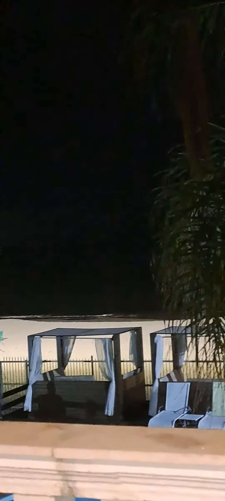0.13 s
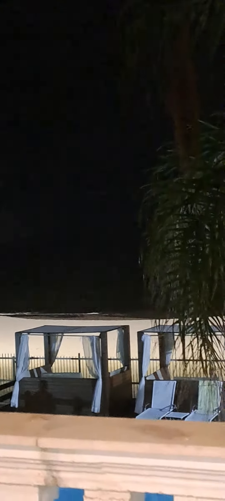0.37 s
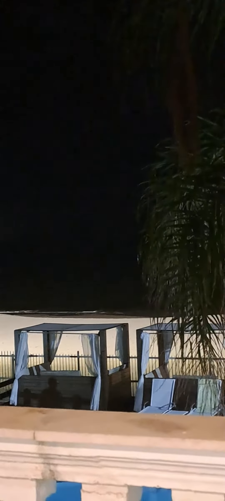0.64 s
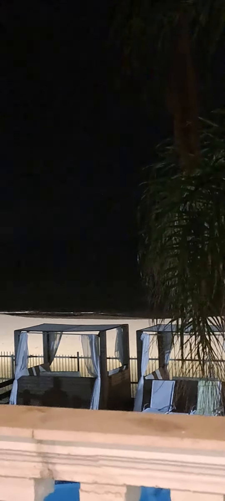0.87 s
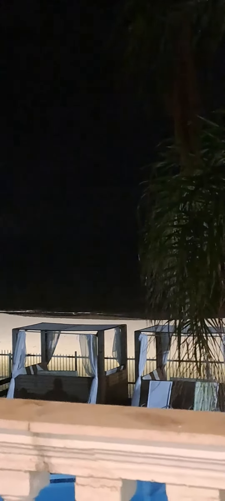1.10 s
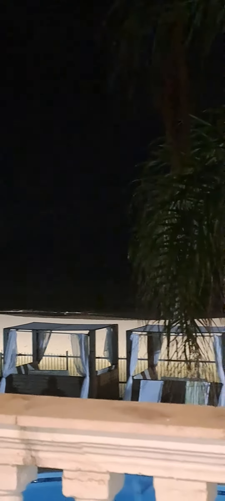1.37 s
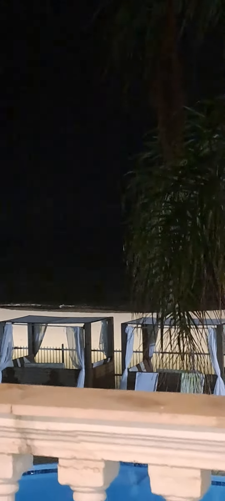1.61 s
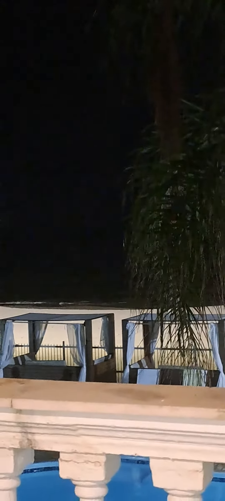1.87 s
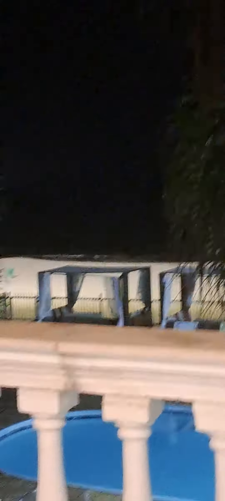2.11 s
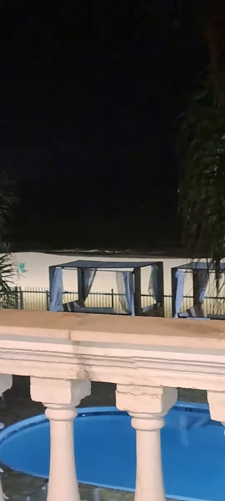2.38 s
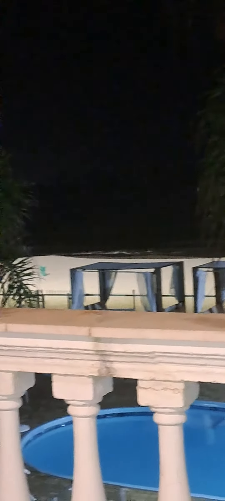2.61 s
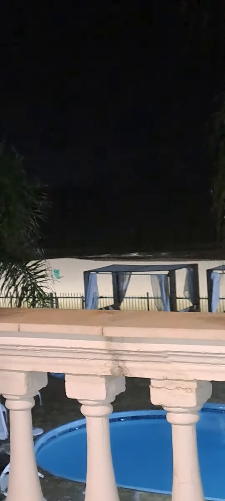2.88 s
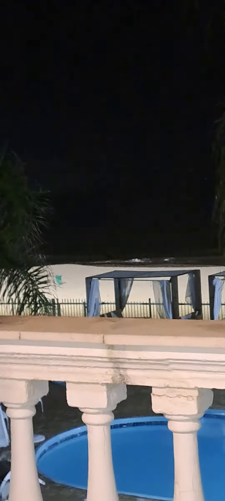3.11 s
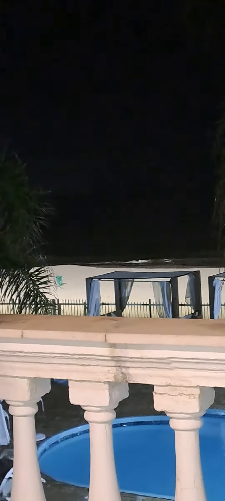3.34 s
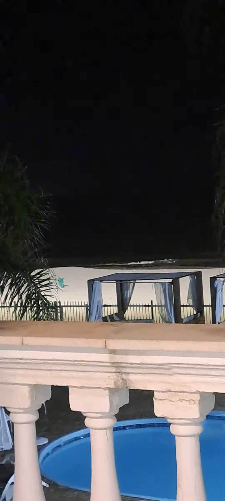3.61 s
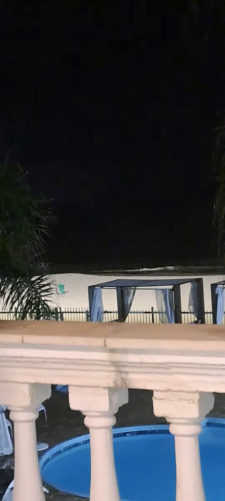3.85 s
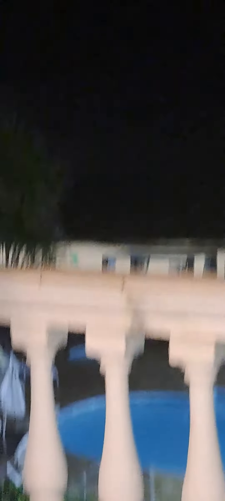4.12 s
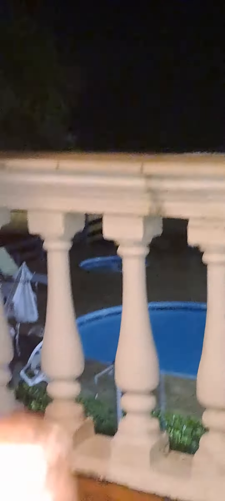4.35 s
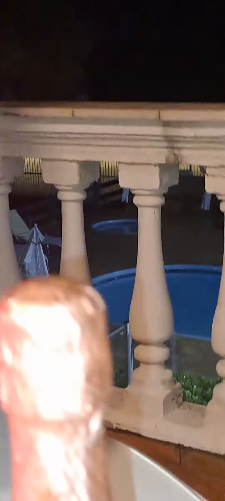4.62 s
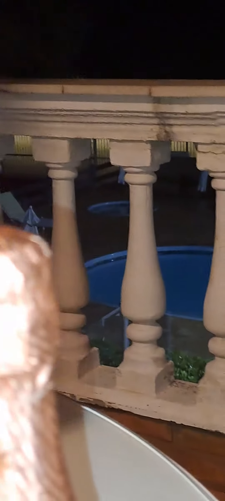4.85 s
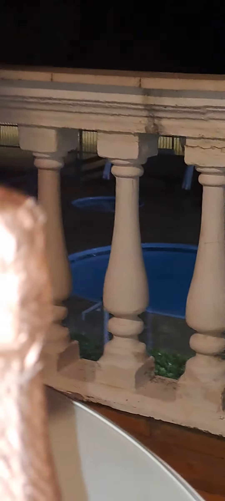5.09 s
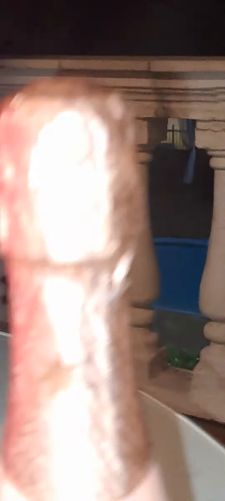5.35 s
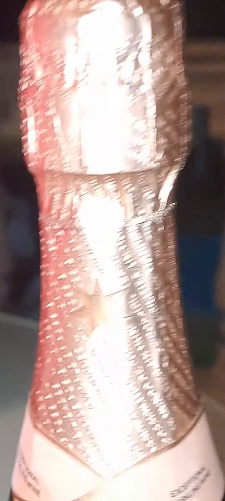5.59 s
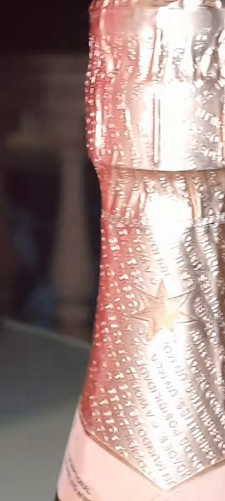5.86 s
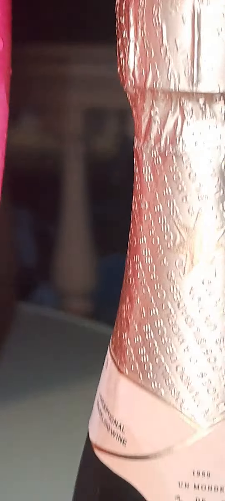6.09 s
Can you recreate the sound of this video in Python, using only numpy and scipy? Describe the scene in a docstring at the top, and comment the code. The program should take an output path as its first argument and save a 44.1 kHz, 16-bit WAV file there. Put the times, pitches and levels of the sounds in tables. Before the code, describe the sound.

On a quiet night balcony, soles swish and thud, a chair leg scrapes tile, a distant wave swells, then a bottle and cup knock a table.

```python
"""A glass bottle, then a plastic cup, set down on a hollow table close by on the right, rocking a little.
The place is a tiled balcony at night above a beach: table top, vessel and clatter ring as decaying modes.
Before that a chair leg drags in stick-slip jerks; soles swish and thud on the tiles as swelling noise.
Farther off a wave swells and fades in coloured noise, and a machine hums as a wavering low tone.
The stereo microphone gets the near sounds later and duller on its left, with dense balcony reflections."""
import sys
import numpy as np
from scipy import signal
from scipy.io import wavfile

SR = 44100
rng = np.random.default_rng(int(sys.argv[2]) if len(sys.argv) > 2 else 0)


def generate_wav(sig):
    """Save sig (samples, or channels by samples) to the path in sys.argv[1] as 16-bit PCM at SR."""
    pcm = np.round(np.clip(np.atleast_2d(sig).T, -1, 1) * 32767).astype(np.int16)
    wavfile.write(sys.argv[1], SR, pcm)


def amplitude_ratio(level_db):
    """Convert a level in decibels to the matching linear amplitude (field) ratio."""
    exponent = np.asarray(level_db, float) / 20
    return 10 ** exponent


N = 274302  # length in samples


def rms_one(x):
    """Scales to unit power."""
    return x / np.sqrt(np.mean(x ** 2) + 1e-20)


def over_time(points):
    """Reads a timed level, joined by straight lines, at every sample."""
    s, level_db = np.transpose(points)
    return np.interp(np.arange(N) / SR, s, level_db)


def at_hz(points, hz):
    """Reads a spectrum on a log-frequency axis."""
    points_hz, values = np.transpose(points)
    return np.interp(np.log(hz), np.log(points_hz), values)


def drift(rate_hz):
    """Slow random wandering of spread 1: noise through two equal low-pass poles, at one point in 40 samples."""
    r = np.exp(-80 * np.pi * rate_hz / SR)
    noise = rng.standard_normal(N // 40 + 2002)
    slow = signal.lfilter([1], [1, -2 * r, r * r], noise)[2000:]
    return np.interp(np.arange(N) / 40, np.arange(len(slow)), rms_one(slow))


def resonate(x, hz, width_hz):
    """One resonance, gain 1 on top."""
    r = np.exp(-np.pi * width_hz / SR)
    poles = [1, -2 * r * np.cos(2 * np.pi * hz / SR), r * r]
    return signal.lfilter([(1 - r * r) / 2, 0, (r * r - 1) / 2], poles, x)


def high_pass(x, hz):
    """Takes away the bass below hz."""
    return signal.sosfilt(signal.butter(3, hz, "high", fs=SR, output="sos"), x)


def power_db(spectrum, low_hz, high_hz):
    """Power that white noise keeps in one band after this colouring."""
    hz = np.linspace(low_hz, high_hz, 200)
    return 10 * np.log10(np.mean(amplitude_ratio(2 * at_hz(spectrum, hz))) * (high_hz - low_hz) / (SR / 2))


def swells(rows):
    """Power of each swell over time: a rounded rise to its loudest moment, then a fall."""
    edge_db, roundness = 20, 1.534  # a swell loses edge_db over its rise or fall time
    s, rise_s, fall_s, db = np.transpose(rows)[:4, :, None]
    late = np.arange(0, N + 32, 32) / SR - s
    distance = np.abs(late / np.where(late < 0, rise_s, fall_s))
    return amplitude_ratio(2 * (db - edge_db * distance ** roundness)) + 1e-30


def blend(power, values):
    """Total level in dB of overlapping sounds, and a property averaged by their power."""
    total = power.sum(axis=0)
    at = np.linspace(0, power.shape[1] - 1, N)
    columns = 10 * np.log10(total), np.dot(values, power) / total
    return [np.interp(at, np.arange(len(total)), c) for c in columns]


# Half-octave band edges [Hz]
EDGES_HZ = 25 * 2 ** np.arange(0, 9.6, .5)
# How alike left and right are: (frequency [Hz], likeness [-1 to 1])
LIKENESS = [(60, 1), (180, 0.89), (550, 0.73), (1650, -0.034), (4970, -0.012), (15000, 0.096)]


def noise_bands(size):
    """Half-octave bands of stereo noise, alike in the bass and nearly unrelated in the treble."""
    white = rng.standard_normal((2, 2, size))
    for k, (low, high) in enumerate(zip(EDGES_HZ, EDGES_HZ[1:])):
        # neighbouring bands take turns between two independent noises
        band_pass = signal.butter(2, [low, high], "band", fs=SR, output="sos")
        mid, side = signal.sosfilt(band_pass, white[k % 2])
        hz = np.sqrt(low * high)
        alike = np.clip(at_hz(LIKENESS, hz), -1, 1)
        yield hz, np.sqrt((1 + alike) / 2) * mid + np.sqrt((1 - alike) / 2) * side * [[1], [-1]]


# Reverberation of the balcony: (frequency [Hz], time to fall 60 dB [s])
BALCONY_T60 = [(100, 0.42), (400, 0.25), (1500, 0.27), (4000, 0.27), (9000, 0.19), (16000, 0.1)]


def balcony(x, onset_s):
    """Dense reflections from tiles and walls, dying band by band."""
    t = np.arange(SR // 2) / SR
    tail = sum(band * amplitude_ratio(-60 * t / at_hz(BALCONY_T60, hz)) for hz, band in noise_bands(len(t)))
    tail = tail * (1 - np.exp(-t / onset_s))
    tail = tail / np.sqrt(np.mean(np.sum(tail ** 2, axis=1)))
    return signal.fftconvolve(x[None], tail, axes=1)[:, :N]


def from_right(x, lag_s, left_db, right_db, shadow_hz):
    """A source on the right: the left side hears it later, softer and duller."""
    late = np.interp(np.arange(N) - lag_s * SR, np.arange(N), x)
    late = signal.lfilter(*signal.butter(1, shadow_hz, fs=SR), late)
    return np.array([amplitude_ratio(left_db) * late, amplitude_ratio(right_db) * x])


# Colour of the night air: (frequency [Hz], density [dB per Hz, relative])
NIGHT_AIR = [(18, -33), (30, -33), (75, 13.5), (447, -21), (931, -19), (2330, -3), (3540, -72),
             (4260, -12.5), (7200, -5.5), (9350, -57), (15800, -9)]


def night_air():
    """Steady coloured noise floor of the night; gives its power at any frequency."""
    air_db = -64 - power_db(NIGHT_AIR, 30, 15800)
    return lambda hz: amplitude_ratio(2 * (air_db + at_hz(NIGHT_AIR, hz)))


# Far wave, swelling and fading: (time [s], level within 500-1500 Hz [dB])
SURF = [(0.0, -61), (0.5, -64), (1.1, -66), (1.6, -73), (2.0, -67), (2.9, -60), (3.4, -62.5), (3.7, -52),
        (4.2, -50.5), (4.96, -55), (5.15, -63), (5.6, -65)]
# Its colour: (frequency [Hz], density [dB per Hz, relative])
SURF_COLOUR = [(88, -41), (150, -9.5), (217, -9), (332, -7.5), (490, -3.5), (781, -7.5), (1110, -7.5),
               (2200, -12.5), (6500, -27), (9000, -42), (15500, -70)]


def surf():
    """A far wave as noise of fixed colour and moving level; gives its power at any frequency."""
    surf_db = over_time(SURF) - power_db(SURF_COLOUR, 500, 1500)
    return lambda hz: amplitude_ratio(2 * (surf_db + at_hz(SURF_COLOUR, hz)))


# Machine hum, before its waver: (time [s], level [dB])
HUM = [(0.0, -51), (0.08, -51), (0.2, -67), (0.4, -40), (0.48, -51), (1.9, -55), (2.9, -59.5), (3.15, -63),
       (3.85, -47.5), (4.3, -53), (4.75, -55), (5.3, -48), (5.6, -49.5), (6.22, -61)]


def hum():
    """A low tone whose pitch and level waver, with a slight roughness around it."""
    hum_hz, width_hz = 58.5, 8
    waver_db, waver_hz = 2.3, 4.6
    tone = np.sin(2 * np.pi * np.cumsum(hum_hz + 1.45 * drift(1.92)) / SR)
    rough = rms_one(resonate(rng.standard_normal((2, N)), hum_hz, width_hz))
    level = amplitude_ratio(over_time(HUM) + waver_db * drift(waver_hz))
    return level * rms_one(tone + .15 * rough)


# Weight shifting on the floor: (loudest time [s], rise [s], fall [s], level within 75-350 Hz [dB])
THUDS = [(.36, 0.061, 0.2, -48.5), (.64, 0.86, 0.3, -47), (1.3, .15, 0.23, -56.5), (1.77, 0.092, 0.14, -70),
         (3.09, .3, 0.27, -53.5), (3.83, 0.067, 0.16, -49), (4.15, 0.63, 0.75, -50.5),
         (4.54, 0.1, 0.11, -44.5), (4.9, 0.49, .4, -58.5), (5.3, 0.7, 0.33, -53)]
# Colour of the floor: (frequency [Hz], density [dB per Hz, relative])
THUD_COLOUR = [(25, -48), (45, 6), (90, 6.5), (200, 0), (350, -4.5), (700, -15), (1500, -50)]


def thuds():
    """Weight on the tiles as swells of bass noise over a low rumble; gives power at any frequency."""
    rumble_db = -58  # goes on between the thuds
    power = swells(THUDS) + amplitude_ratio(2 * rumble_db) / len(THUDS)
    thud_db, _ = blend(power, np.ones(len(THUDS)))
    thud_db = thud_db - power_db(THUD_COLOUR, 75, 350) + 1.96 * drift(8.6)
    return lambda hz: amplitude_ratio(2 * (thud_db + at_hz(THUD_COLOUR, hz)))


# Soles and cloth sliding: (loudest time [s], rise [s], fall [s],
# level within 9900-14560 Hz before the tilt [dB], tilt around 6 kHz [dB per octave])
SWISH = [(0.03, .1, 0.3, -56, 1.5), (0.388, 0.052, 0.067, -53, -2.5), (.49, 0.074, 0.08, -56.5, 0),
         (.58, 0.028, .1, -54.5, 5), (0.672, 0.13, .13, -46.5, 2), (0.939, .15, 0.17, -46.5, 0.8),
         (1.178, 0.006, 0.067, -46.5, 2), (1.35, 0.42, 0.11, -57.5, 1.5), (1.63, 0.074, 0.22, -67, 2.5),
         (1.727, .02, 0.091, -60.5, -2.5), (1.799, .04, 0.082, -58, 0.7), (2.08, 0.09, .3, -66.5, -2),
         (2.37, 0.052, 0.12, -66.5, -1.5), (2.74, 0.29, 0.13, -58.5, 2), (2.89, 0.092, 0.12, -45.5, .3),
         (3.068, 0.33, .16, -48.5, -0.2), (3.58, 0.27, 0.34, -62, -3.5), (3.81, 0.13, 0.3, -58, -4.5),
         (3.89, .035, 0.14, -44, 1.1), (4.05, 0.12, 0.12, -53, -2.5), (4.408, 0.05, 0.087, -39.5, 1.5),
         (4.52, 0.19, 0.13, -56.5, -0.5), (4.71, 0.044, .4, -60.5, -3), (4.88, 0.06, 0.14, -51, 2),
         (5.049, .08, 0.17, -44, 0.4), (5.169, 0.064, 0.059, -50.5, 2), (5.34, 0.089, 0.1, -55.5, -1.4),
         (5.52, 0.054, 0.16, -67, -1.1), (5.927, 0.0036, .3, -69, 8.5), (6.0, 0.045, 0.11, -65, 8),
         (6.125, 0.019, 0.046, -61, 8), (6.2, 0.15, 0.17, -65.5, 7)]
# Colour before the tilt: (frequency [Hz], density [dB per Hz, relative])
SWISH_COLOUR = [(710, -6.5), (1200, -3), (1590, -19), (1680, -0.5), (2500, -4.5), (3240, 0.5), (3890, -2.5),
                (4820, -1), (7510, -3), (8540, -18), (12200, -3.5), (15100, 0.5), (15800, -22)]


def swishes():
    """Sliding soles and cloth as swells of noise, each with its own tilt; gives power at any frequency."""
    swish_db, tilt_db = blend(swells(SWISH), np.array(SWISH)[:, -1])
    swish_db = swish_db - power_db(SWISH_COLOUR, 9900, 14560) + 1.6 * drift(20)
    return lambda hz: amplitude_ratio(2 * (swish_db + at_hz(SWISH_COLOUR, hz) + tilt_db * np.log2(hz / 6000)))


# Balance of the noises at the microphone: (frequency [Hz], left minus right [dB])
LEAN = [(100, -0.5), (1000, -0.5), (8000, -1), (12000, -7.5), (15500, -7)]


def surroundings():
    """Night air, wave, thuds and swishes are all noisy: their powers add in each flickering band."""
    sources = [night_air(), surf(), thuds(), swishes()]
    out = 0
    for hz, band in noise_bands(N):
        power = sum(source(hz) for source in sources)
        flicker = amplitude_ratio(2.02 * drift(2.44))
        lean = amplitude_ratio(at_hz(LEAN, hz) / 2 * np.array([[1], [-1]]))
        out = out + np.sqrt(power) * flicker * lean * band
    return out


# Coloured scuffs: (middle [s], half length [s], frequency [Hz], width [Hz], level at the middle [dB])
SCUFFS = [(0.338, 0.033, 1920, 352, -49.5), (1.18, 0.0053, 2600, 1500, -63.5),
          (2.19, 0.031, 4300, 150, -62), (4.77, 0.063, 1630, 250, -62), (6.166, 0.085, 4800, 700, -55),
          (6.12, .1, 12300, 1500, -60)]


def scuffs():
    """Short rubs, each noise in one resonance of its own."""
    t = np.arange(N) / SR
    out = 0
    for s, half_s, hz, width_hz, db in SCUFFS:
        rub = rms_one(resonate(rng.standard_normal((2, N)), hz, width_hz))
        out = out + amplitude_ratio(db) * np.exp(-((t - s) / half_s) ** 2) * rub
    return out


def jerks(s, length_s, db, attack_s, sag_db_per_s):
    """Power of each jerk: quick start, steady sag, then the leg lets go."""
    let_go_s = 0.022
    t = np.maximum(np.arange(N) / SR - s[:, None], 0)
    let_go = np.exp(-np.maximum(t - length_s[:, None], 0) / let_go_s)
    shape = (1 - np.exp(-t / attack_s)) * let_go
    return (shape * amplitude_ratio(db[:, None] - sag_db_per_s * t)) ** 2 + 1e-30


# Jerks of the dragging chair leg, levels before the sag:
# (time [s], length [s], frame boom [dB], grit [dB], grit brightness around 1 kHz [dB per octave])
DRAGS = [(2.053, 0.12, -41, -36.5, -1.1), (2.34, 0.11, -47, -55.5, -14.5), (2.543, .05, -32.5, -31.5, 1.5),
         (2.582, 0.1, -30, -31, 1), (2.681, 0.031, -41, -41, -3)]
# Resonances of the boom: (frequency [Hz], width [Hz], relative level [dB])
CHAIR_BOOM = [(148, 44.5, 1), (205, 127, -1.5), (241, 54, 1.5)]
# Resonances of the grit: (frequency [Hz], width [Hz], relative level [dB])
CHAIR_GRIT = [(380, 90, -0.5), (615, 130, 4), (860, 80, 3), (1314, 204, 3), (2410, 270, -1), (3070, 92, -5),
              (3570, 240, -12), (4350, 220, -7), (5020, 440, -9.5), (6340, 520, -16), (7350, 550, -16.5),
              (13000, 3100, -25.5)]


def chair():
    """The leg sticks and slips at a wobbling rate, with fine grit between; frame and foot resonate."""
    slips_per_s, grains_per_s = 196, 2500
    s, length_s, boom_db, grit_db, tilt_db = np.transpose(DRAGS)
    boom_db, _ = blend(jerks(s, length_s, boom_db, attack_s=0.0053, sag_db_per_s=58), tilt_db)
    grit_db, tilt_db = blend(jerks(s, length_s, grit_db, attack_s=0.0014, sag_db_per_s=184), tilt_db)
    # one impulse of random size per slip
    turns = np.floor(np.cumsum(slips_per_s * (1 + .16 * drift(50))) / SR)
    slips = np.diff(turns, prepend=0) * amplitude_ratio(4.1 * rng.standard_normal(N))
    # grains at random times, a few of them much larger
    sizes = amplitude_ratio(5.6 * np.minimum(rng.exponential(1, N), 5)) * rng.choice([-1, 1], N)
    grains = sizes * (rng.random(N) < grains_per_s / SR)
    force = rms_one(slips) + 0.98 * rms_one(grains)

    def parts(modes):  # neighbouring resonances have opposite sign
        return [amplitude_ratio(db) * resonate(force, hz, w) * (-1) ** k for k, (hz, w, db) in enumerate(modes)]

    boom = sum(parts(CHAIR_BOOM))
    grit_parts = parts(CHAIR_GRIT)
    grit = sum(amplitude_ratio(tilt_db * np.log2(hz / 1000)) * part for (hz, _, _), part in zip(CHAIR_GRIT, grit_parts))
    drag = amplitude_ratio(boom_db) * rms_one(boom) + amplitude_ratio(grit_db) * grit / np.std(sum(grit_parts))
    return high_pass(drag, 100)


def rings(modes, t, swell_s):
    """Decaying sines that swell while the contact builds up."""
    hz, db, t60 = np.transpose(modes)[:, :, None]
    strength = amplitude_ratio(db + 1.0 * rng.standard_normal(hz.shape))
    swell = 1 - np.exp(-(t / swell_s) ** 2)
    return np.sum(strength * swell * amplitude_ratio(-60 * t / t60) * np.sin(2 * np.pi * hz * t), axis=0)


# Set-downs and small touches, levels at the table: (time [s], peak of the table knock [dB],
# contact [ms], clatter against the knock [dB], feed to the reflections against the direct sound [dB])
KNOCKS = [(5.437, -40, 0.28, -23, -12), (5.628, -38.5, 0.074, -26, 16), (5.632, -2, 0.006, -14, 1),
          (5.926, -47.5, 0.12, -4.5, -8), (5.974, -67, 0.069, -16, -4), (5.993, -45.5, 0.078, -30, 11.5),
          (6.015, -25, 0.68, -14.5, -1), (6.028, -3, 0.047, -14.5, -7), (6.138, -32.5, 0.24, -14, -22),
          (6.164, -33.5, 0.18, -23, -8)]
# Modes of the table top, before the contact dulls them:
# (frequency [Hz], relative level [dB], time to fall 60 dB [s])
TABLE = [(150, -27.5, 0.15), (230, -16.5, 0.023), (334, -15, 0.025), (411, -8.5, 0.053), (458, -14, 0.044),
         (634, -17.5, 0.043), (708, -2, 0.018), (842, 0.5, 0.011), (963, -8, 0.02), (1284, -5, 0.011),
         (1580, 7.5, 0.012), (1970, -21, 0.0035), (2185, -1.5, 0.013), (2600, -7, 0.019),
         (3110, -5.5, 0.0072)]
# Modes of the glass bottle: (frequency [Hz], relative level [dB], time to fall 60 dB [s])
BOTTLE = [(3892, -6, .15), (4113, 0, .24), (4150, -7, .2), (4247, -8, .15), (4732, -10, .05)]
# Modes of the plastic cup: (frequency [Hz], relative level [dB], time to fall 60 dB [s])
CUP = [(3892, -3, .05), (4479, -7, .03), (4893, 0, .08), (5378, -6, .03), (5572, -9, .04), (8253, -7, .03)]
# Resonances of the clatter: (frequency [Hz], width [Hz], relative level [dB])
CLATTER = [(3460, 1800, 5), (5100, 770, 1), (6950, 490, -23), (11700, 2000, -3.5)]
# Ring of each vessel against the clatter [dB]
RING_AGAINST_CLATTER_DB = {"bottle": -9.5, "cup": -6.5}
# The cup rocks and sets the hollow top humming:
# (time [s], length [s], frequency [Hz], level at the table [dB])
ROCKING = [(5.866, 0.019, 450, -42), (5.884, 0.016, 430, -44), (5.93, 0.038, 438, -49),
           (5.992, 0.026, 413, -44), (6.014, 0.021, 380, -29.5), (6.14, 0.012, 478, -30.5),
           (6.166, 0.017, 466, -36), (6.195, 0.021, 447, -49)]


def set_downs():
    """Each touch rings table top and vessel, with a gritty clatter; returns direct sound and room feed."""
    cup_from_s = 5.8  # touches before this are the bottle's
    t = np.arange(SR // 2) / SR
    out = np.zeros((2, N + SR))

    def place(s, sound):
        start = round(s * SR)
        out[:, start:start + len(t)] += sound

    for s, peak_db, contact_ms, clatter_db, wet_db in KNOCKS:
        name, modes = ("cup", CUP) if s > cup_from_s else ("bottle", BOTTLE)
        r = np.exp(-1000 / (SR * contact_ms))  # a longer contact sounds duller
        top = signal.lfilter([1], [1, -2 * r, r * r], rings(TABLE, t, swell_s=0.00072))
        decay = np.exp(-t / 0.0012) + 0.34 * np.exp(-t / 0.013)
        grit = rng.standard_normal(len(t)) * (1 - np.exp(-t / 0.0002)) * decay
        clatter = sum(amplitude_ratio(db) * resonate(grit, hz, w) for hz, w, db in CLATTER)
        # the base keeps brushing the table, so the ring flutters
        flutter = amplitude_ratio(3 * rms_one(signal.lfilter([1], [1, -.99], rng.standard_normal(len(t)))))
        vessel = flutter * rings(modes, t, swell_s=0.0015)
        ring_db = clatter_db + RING_AGAINST_CLATTER_DB[name]
        blow = top / np.max(np.abs(top)) + amplitude_ratio(clatter_db) * clatter
        blow = blow + amplitude_ratio(ring_db) * vessel * [[1], [.3]]  # less of the ring reaches the walls
        place(s, amplitude_ratio(peak_db) * blow * amplitude_ratio([[0], [wet_db]]))
    for s, length_s, hz, db in ROCKING:
        swell = np.sin(np.pi * np.clip(t / length_s, 0, 1) ** 0.6)
        place(s, amplitude_ratio(db) * swell * np.sin(2 * np.pi * hz * t) * [[1], [.3]])
    # the strongest knock mode beams at the listener, so little of it reaches the walls
    out[1] -= 0.94 * resonate(out[1], 1590, 500)
    return high_pass(out[:, :N], 125)


def scene():
    """Near sources with their reflections over the surroundings."""
    knocks, feed = set_downs()
    drags = chair()
    table = from_right(knocks, lag_s=0.00033, left_db=-3.4, right_db=4.0, shadow_hz=800)
    table = table + amplitude_ratio([[-2.5], [1.5]]) * balcony(feed, onset_s=0.00043)
    floor = from_right(drags, lag_s=0.00029, left_db=-2.5, right_db=-1.3, shadow_hz=4700)
    floor = floor + amplitude_ratio([[-4], [-3]]) * balcony(drags, onset_s=0.00053)
    return table + floor + surroundings() + scuffs() + hum() * amplitude_ratio([[-.4], [.4]])


def roll_off(x):
    """The treble ends steeply here."""
    return signal.sosfilt(signal.butter(12, 16970, fs=SR, output="sos"), x)


def record(dry):
    """At the microphone, peaks are rounded near full scale and the top of the treble is cut."""
    rounded = 1.2 * np.tanh(dry / 1.24)
    low_pass = signal.cheby2(12, 50, 16150, fs=SR, output="sos")  # 50 dB down from 16150 Hz
    mix = signal.sosfilt(low_pass, rounded)
    return roll_off(mix)


dry = scene()
out = record(dry)
generate_wav(out)
```